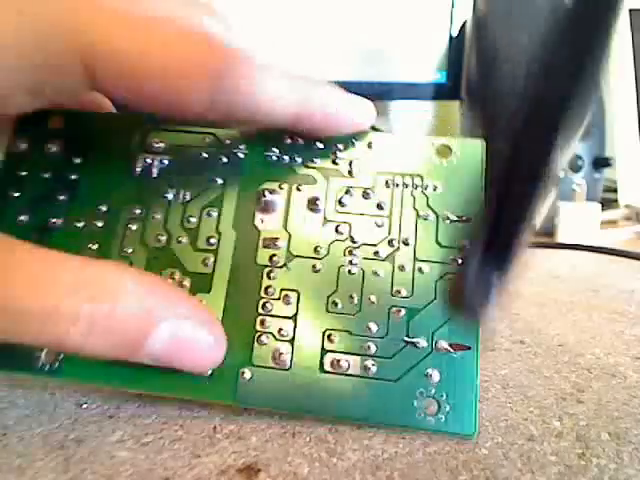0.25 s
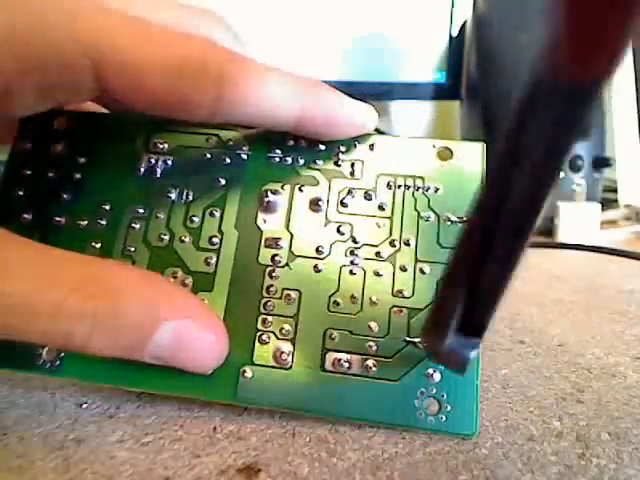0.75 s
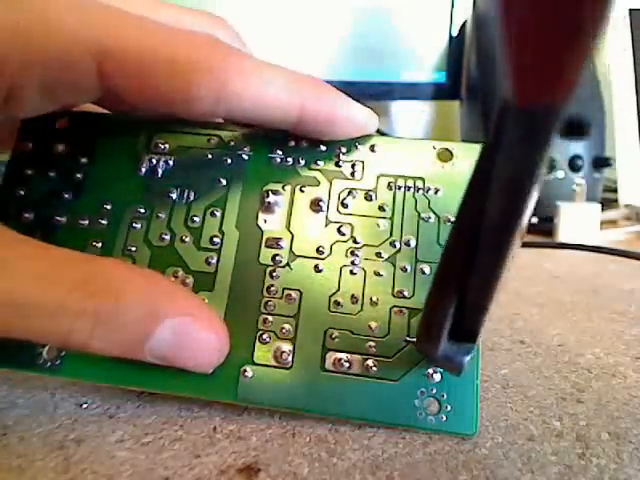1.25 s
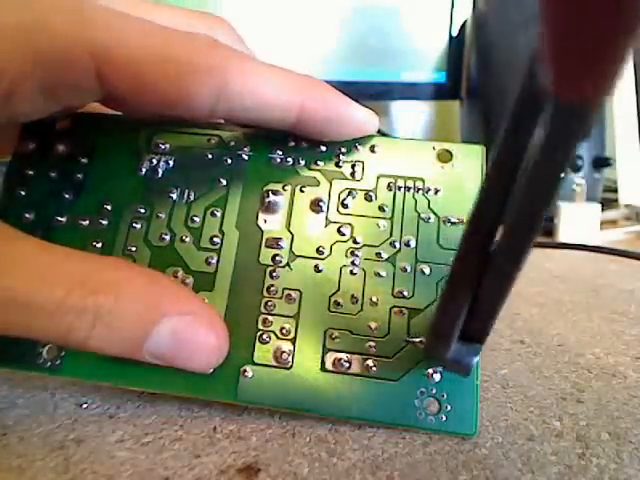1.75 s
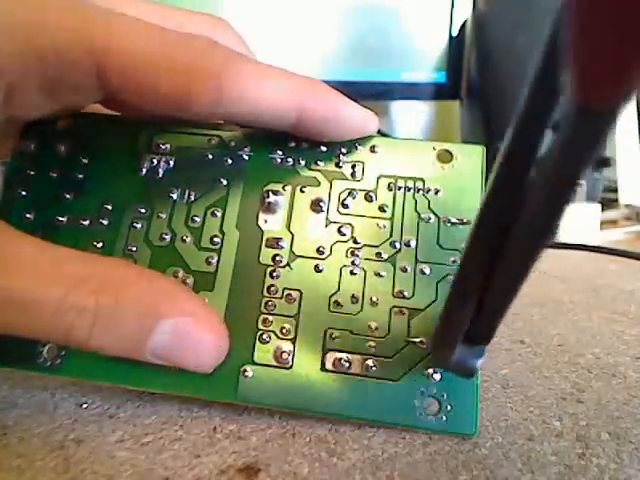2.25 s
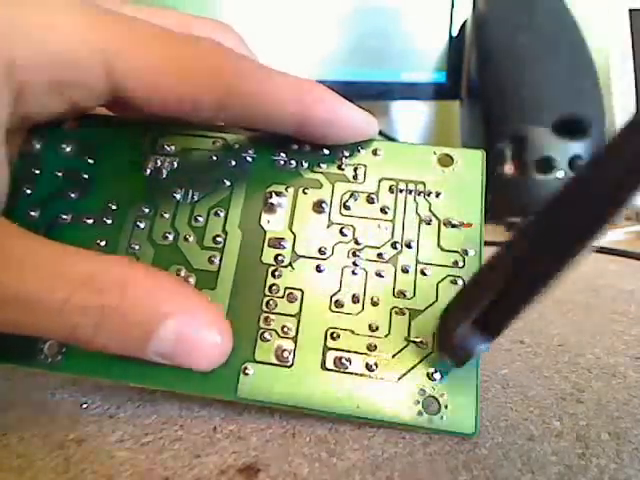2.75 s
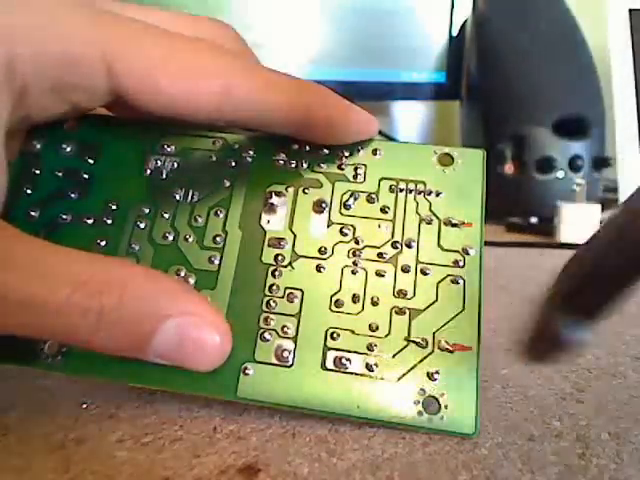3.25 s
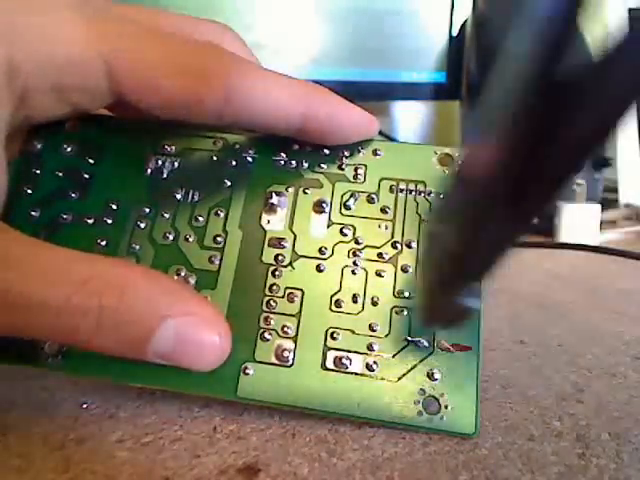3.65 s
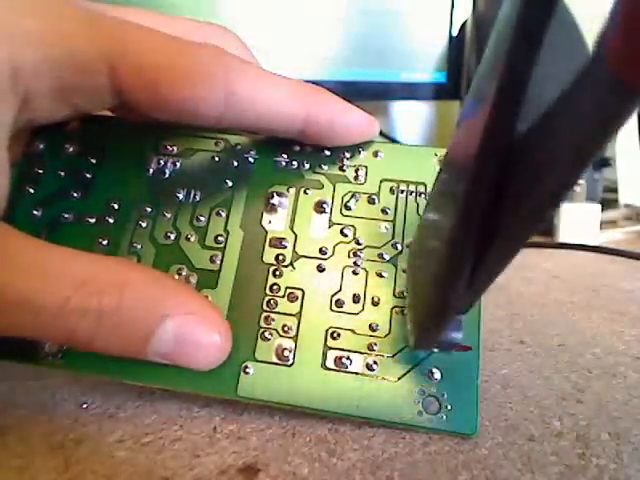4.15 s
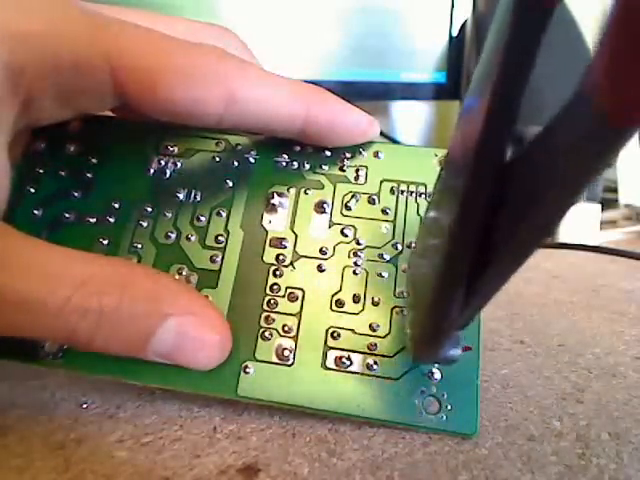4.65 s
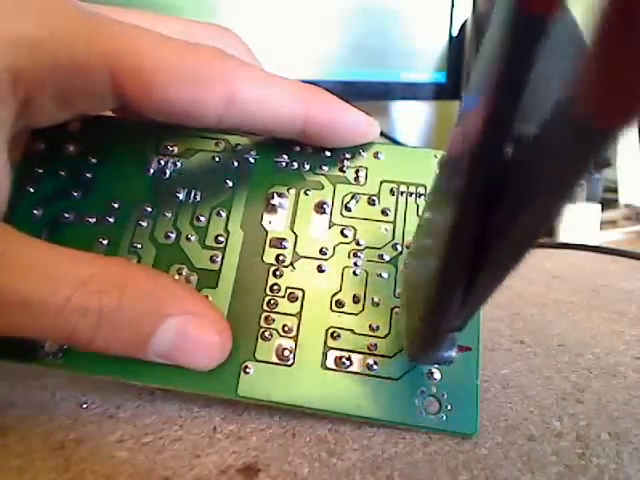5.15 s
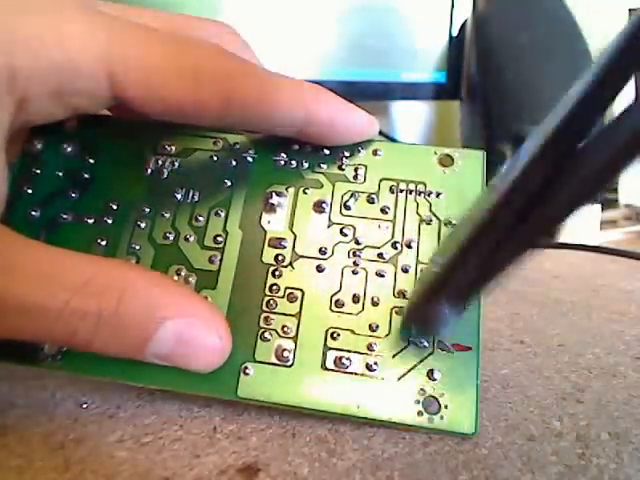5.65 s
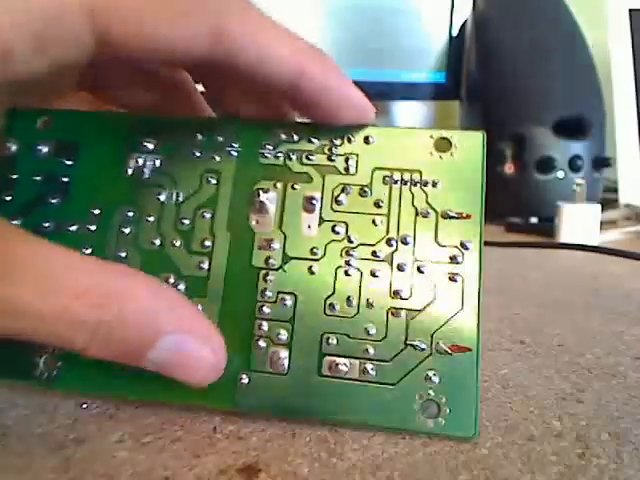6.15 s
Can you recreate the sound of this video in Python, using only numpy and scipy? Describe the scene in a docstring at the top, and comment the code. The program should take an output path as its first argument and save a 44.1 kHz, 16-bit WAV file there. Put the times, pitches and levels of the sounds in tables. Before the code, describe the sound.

Close, light knocks and steel clicks of cutters against a circuit board, with one crisp snip and a closing rattle over faint fan noise.

```python
"""A bench in a small room: wire cutters work at the leads of an upright, hand-held circuit board,
close to a small microphone. Equipment hums over fan noise. The jaws scrape and knock, ringing the
modes of board and steel; stick-slip friction makes faint squeaks and chirps. Steel clicks on steel,
one lead parts with a sharp snap that frees the board, and at the end the jaws clatter shut."""
import sys
import numpy as np
from scipy import signal
from scipy.fft import rfft, irfft
from scipy.io import wavfile

SR = 44100
rng = np.random.default_rng(int(sys.argv[2]) if len(sys.argv) > 2 else 0)


def persist_wave(psi):
    """Save psi, clipped to +-1, as 16-bit WAV."""
    counts = np.round(np.clip(psi, -1, 1) * 32767).astype(np.int16)
    wavfile.write(sys.argv[1], SR, np.atleast_2d(counts).T)


N = 282813
TIME_S = np.arange(N) / SR

# Steady equipment hum. Each row: frequency in Hz, RMS level in dB.
HUM_TONES = [(59.2, -56), (119.5, -62.5), (237, -62.5), (356, -68), (748, -65.5), (813, -69.5)]
# Hum tones that swell and fade. Each row: middle in seconds, length in seconds, frequency in Hz,
# top RMS level in dB.
HUM_SWELLS = [(.05, 0.3, 245, -55.5), (2.8, 1.05, 241.7, -50.5), (3.804, 0.7, 361.2, -53),
              (6.052, 2.6, 116.9, -51.5), (6.05, 1.3, 234.4, -54)]
# Fan and air noise spectrum. Each row: frequency in Hz, relative density in dB.
AIR_SPECTRUM = [(12, -21), (20, 7), (27, -7.5), (62, -3), (86, -9), (125, -12), (148, -11.5), (232, -17.5),
                (297, -10), (353, -15), (389, -15.5), (760, -21), (860, -22), (6220, -40.5), (7200, -44),
                (9620, -99), (16300, -120)]
# Board modes. Each row: frequency in Hz, level in dB, t60 in seconds, change for an edge hit in dB.
BOARD_MODES = [(131, -42.5, 0.31, 0), (183.8, -39.5, 0.11, 19), (221, -27.5, 0.11, 11),
               (299, -8.5, 0.055, -12.5), (334.3, -23, 0.081, 1.5), (390.4, -22, 0.065, 2.5),
               (527, -23.5, 0.036, -0.5), (657, -17.5, 0.045, -11), (708, -21, 0.072, -8.5),
               (838, -17, 0.025, 0), (945, -14.5, 0.012, 4.5), (1525, -18, 0.028, 2),
               (1580, -19.5, 0.03, -5), (2008, -16.5, 0.032, -2), (2180, -26, 0.0065, -6),
               (2660, -27.5, 0.02, 3)]
# Cutter modes, damped by the grip. Each row: frequency in Hz, level in dB, t60 in seconds.
STEEL_MODES = [(3040, -24.5, 0.013), (3590, -32.5, 0.015), (3796, -23.5, 0.019), (4220, -30, 0.025),
               (4480, -28.5, 0.014), (5440, -28.5, 0.0049), (5850, -29, 0.026), (6300, -36.5, 0.046),
               (6660, -28, 0.016), (6770, -30.5, 0.016), (7100, -33, 0.014), (7270, -34.5, 0.01)]
# Jaws sliding on the board. Each row: middle in seconds, length in seconds, board gain in dB,
# contact time in ms, nearness to the edge from 0 to 1, steel gain in dB.
SCRAPES = [(.172, 0.052, -26.5, 0.46, .65, -39), (0.404, 0.044, -14.5, 1.4, 0.93, -27),
           (.435, .04, -21, 1.35, 0.95, -28), (3.273, .06, -17, 0.61, 0.34, -24),
           (5.79, .14, -15.5, 0.66, 0.35, -25.5), (6.261, 0.052, -12, 1.43, 0.3, -18)]
# Breathy jaw squeaks. Each row: middle in seconds, length in seconds, pitch in Hz, top RMS level in dB,
# bandwidth in Hz.
SQUEAKS = [(0.409, 0.034, 820, -44, 250), (0.403, 0.079, 2830, -55.5, 450), (0.407, 0.098, 6370, -59, 700),
           (1.514, .012, 2710, -45, 800), (1.534, 0.017, 2770, -48, 300), (2.322, 0.18, 3210, -60, 650),
           (2.7, 0.1, 3100, -61.5, 550), (3.278, 0.029, 1550, -49, 350), (3.279, .02, 2800, -52, 400),
           (3.28, .02, 6230, -46, 500)]
# Jaws catching. Each row: middle in seconds, length in seconds, pitch in Hz, peak in dB.
CHIRPS = [(.397, .012, 2000, -46), (0.4135, .014, 2080, -43), (.429, .026, 2010, -45),
          (5.813, .009, 1556, -43), (5.835, .022, 1500, -42)]
# Jaws bumping the board. Each row: start in seconds, board gain in dB, contact time in ms,
# nearness to the edge from 0 to 1, steel gain in dB, board pitch as a ratio.
KNOCKS = [(1.01, -4, 1.27, 0.4, -16, 0.97), (1.109, -24, 0.69, 0.9, -38, 0.96),
          (1.3196, -5, 1.96, 0.37, -17.5, 0.96), (1.699, -17.5, 2.3, 0.14, -29, 1.08),
          (2.326, -13, 3.2, 0.6, -23, 1.01), (2.6246, -16.5, 2.4, 0.5, -30, 0.88),
          (3.1139, -10.5, 0.35, 0.6, -12, 1.05), (4.2012, -6.5, 0.46, 0.98, -33, 1.004),
          (4.2284, -9, 1.05, 0.56, -29, 1.09), (4.514, -12, 1.48, 0.55, -25, 0.98),
          (4.6023, -2, 0.66, 0.41, -20, 1), (4.6457, -6.5, 0.68, 0.68, -48, 1),
          (4.9178, 5.5, 1.82, 0.37, -8, 1.01), (4.978, -15.5, 1.3, 0.95, -36, 0.93),
          (5.348, -8, 1.34, 0.86, -31, 1.04), (5.7733, -9, 2.1, 0.36, -19.5, 1.06),
          (5.8569, -5.5, 3.0, 0.36, -20, 0.93), (6.248, -14, 1.9, 0.78, -23, 1.04)]
# Steel on steel. Each row: start in seconds, gain in dB, board contact time in ms, low cut in Hz.
CLICKS = [(2.6235, -23, 1.3, 3000), (3.1022, -14, 1.3, 1500), (3.1295, -23, .6, 2000),
          (3.149, -29, .6, 2500), (3.195, -22, .7, 5500), (3.4143, -9, 0.065, 4200),
          (3.5533, -24.5, .7, 4500), (4.977, -11.5, 2.06, 3300), (5.348, -10.5, 2.95, 2000)]
# Modes of the freed board and lead stub. Each row: frequency in Hz, level in dB, t60 in seconds.
FREED_MODES = [(320, -17.5, 0.12), (392, -30, 0.16), (720, -22, 0.11), (816, -26.5, 0.1), (966, -16, 0.036),
               (1450, -13.5, 0.033), (1506, -18, 0.024), (2020, -11, 0.034), (2225, -29, .05),
               (2570, -18, 0.027), (3250, -17.5, 0.026), (3420, -29, 0.03), (4160, -24, 0.024),
               (4570, -19.5, 0.02), (6030, -33, .03), (6500, -27, 0.031), (6910, -24.5, 0.027)]
# Closing touches that grow, then settle. Each row: start in seconds, gain in dB.
CLATTER_TOUCHES = [(6.3463, -4), (6.3493, -2.5), (6.3519, 4), (6.3563, -7.5), (6.372, -24), (6.396, -19)]
# Cutter modes with the jaws shut. Each row: frequency in Hz, level in dB, t60 in seconds.
SHUT_MODES = [(1290, -31, .015), (1855, -33.5, 0.027), (1990, -33, .03), (2760, -24.5, 0.013),
              (3320, -39, .04), (3520, -25, 0.02), (3806, -20.5, 0.022), (3986, -30, .02), (4260, -32, .04),
              (5370, -30, 0.031), (5920, -31, .018), (6630, -28, 0.018), (7380, -27.5, 0.028)]
# Room echo. Each row: frequency in Hz, level in dB, t60 in seconds.
ROOM_DECAY = [(120, -12.5, 0.47), (302, -10, 0.67), (800, -8, 0.28), (2000, -12, 0.19), (4500, -11, 0.24),
              (7500, -14, 0.4)]

GRIND_S = 0.018  # slip of the edges at the cut and the closing
CLICK_EDGE = 0.51  # nearness to the board's edge for clicks and clatter


def from_db(db):
    """Decibels to gain."""
    return 10 ** (np.asarray(db) / 20)


def unit_energy(x):
    """Scale to the energy of a unit click."""
    return x / np.sqrt(np.sum(x ** 2) + 1e-20)


def filtered(x, hz, kind):
    """Butterworth filter of order 2."""
    return signal.sosfilt(signal.butter(2, hz, kind, fs=SR, output="sos"), x)


def at_hz(rows, hz):
    """Interpolate a spectrum's columns over log frequency."""
    points_hz, *columns = np.transpose(rows)
    return [np.interp(np.log(hz), np.log(points_hz), column) for column in columns]


def add(track, start_s, sound):
    """Mix a sound into a track."""
    start = max(round(start_s * SR), 0)
    part = sound[:max(N - start, 0)]
    track[start:start + len(part)] += part


def dying_noise(t, t60_s):
    """Unit-energy noise that falls 60 dB in t60_s."""
    return unit_energy(rng.standard_normal(len(t)) * np.exp(-np.log(1000) * t / t60_s))


def body(force, modes, wash_db, wash_t60_s, wash_hz, build_cycles=0.93, spread_db=1.5):
    """A struck body rings in its main modes, varied per hit, and a short wash of many weak ones."""
    t, ring = TIME_S[:SR // 5], 0
    for hz, db, t60_s in modes:
        envelope = np.exp(-np.log(1000) * t / t60_s) * (1 - np.exp(-t * hz / build_cycles))
        gain = from_db(db + spread_db * rng.standard_normal())
        ring = ring + gain * envelope * np.cos(2 * np.pi * hz * t)
    wash = from_db(wash_db) * filtered(dying_noise(t, wash_t60_s), wash_hz, "band")
    return signal.fftconvolve(force, ring + wash)


def hum():
    """Equipment tones: some steady, some rising and falling in an arch."""
    tones = [(hz, from_db(db)) for hz, db in HUM_TONES]
    for middle_s, length_s, hz, db in HUM_SWELLS:
        arch = np.cos(np.pi * np.clip((TIME_S - middle_s) / length_s, -0.5, 0.5))
        tones.append((hz, from_db(db) * arch))
    return np.sqrt(2) * sum(rms * np.sin(2 * np.pi * (hz * TIME_S + rng.random())) for hz, rms in tones)


def air(rms_db=-47.5):
    """Steady rush of fans and room air."""
    hz = np.maximum(np.arange(N // 2 + 1) * SR / N, 1)
    density_db, = at_hz(AIR_SPECTRUM, hz)
    noise = irfft(rfft(rng.standard_normal(N)) * from_db(density_db), N)
    return from_db(rms_db) * np.sqrt(N) * unit_energy(noise)


def slide(length_s, slips_per_s=1400, spread_db=4):
    """Force of one stroke: many tiny, uneven slips."""
    size = int(length_s * SR)
    slips = (rng.random(size) < slips_per_s / SR) * rng.choice([-1, 1], size)
    return unit_energy(slips * from_db(spread_db * rng.standard_normal(size)) * np.hanning(size))


def soften(force, contact_ms, rebound_ratio=0.019):
    """A long contact passes less treble; a short one bounces off and moves little bass."""
    corner_hz = min(1000 / contact_ms, 0.4 * SR)
    return filtered(filtered(force, corner_hz, "low"), rebound_ratio * corner_hz, "high")


def contact(force, board_db, contact_ms, edge, steel_db, stiffness_ratio=7.1, pitch_ratio=1):
    """One force drives the board and the stiffer jaws; where it lands weights the board modes."""
    modes = [(hz * pitch_ratio, db + edge * edge_db, t60_s) for hz, db, t60_s, edge_db in BOARD_MODES]
    board_force = soften(force, contact_ms)
    steel_force = soften(force, contact_ms / stiffness_ratio)
    board = body(board_force, modes, wash_db=2, wash_t60_s=0.055, wash_hz=(330, 1100))
    steel = body(steel_force, STEEL_MODES, wash_db=-1.5, wash_t60_s=0.033, wash_hz=(2800, 9500))
    return from_db(board_db) * board + from_db(steel_db) * steel


def scrapes():
    """The jaws slide over solder and copper."""
    out = np.zeros(N)
    for middle_s, length_s, board_db, contact_ms, edge, steel_db in SCRAPES:
        add(out, middle_s - length_s / 2, contact(slide(length_s), board_db, contact_ms, edge, steel_db))
    return out


def room(x, onset_s=0.0014):
    """Bench and wall reflections merge into a tail that dies band by band."""
    t, tail = TIME_S[:SR * 3 // 4], 0
    edges_hz = np.geomspace(80, 9000, 12)
    for low_hz, high_hz in zip(edges_hz, edges_hz[1:]):
        db, t60_s = at_hz(ROOM_DECAY, np.sqrt(low_hz * high_hz))
        tail = tail + from_db(db) * filtered(dying_noise(t, t60_s), (low_hz, high_hz), "band")
    return signal.fftconvolve(x, tail * np.minimum(t / onset_s, 1) ** 2)[:N]


def squeaks():
    """Dry friction excites narrow resonances; pitch depends on where the jaws catch."""
    out = np.zeros(N)
    for middle_s, length_s, hz, db, width_hz in SQUEAKS:
        size = int(length_s * SR)
        noise = filtered(rng.standard_normal(SR // 4), (hz - width_hz / 2, hz + width_hz / 2), "band")
        rub = unit_energy(noise[-size:]) * np.sqrt(size)
        add(out, middle_s - length_s / 2, from_db(db) * rub * np.hanning(size))
    return out


def chirps(sag_per_s=1.2, waver_depth=0.041, waver_hz=450):
    """Stick-slip locks onto one resonance: a short, unsteady tone that sags as pressure eases."""
    out = np.zeros(N)
    for middle_s, length_s, hz, db in CHIRPS:
        t = TIME_S[:int(length_s * SR)]
        noise = filtered(rng.standard_normal(SR // 4), waver_hz, "low")
        waver = waver_depth * noise[-len(t):] / noise.std()
        pitch_hz = hz * (1 - sag_per_s * (t - length_s / 2) + waver)
        tone = np.sin(2 * np.pi * np.cumsum(pitch_hz) / SR)
        add(out, middle_s - length_s / 2, from_db(db) * np.sin(np.pi * t / length_s) * tone)
    return out


def tap(crunch=0.5, crunch_t60_s=0.02, low_cut_hz=450):
    """Force of one touch: a sharp push, then the fine crunch of yielding metal."""
    force = crunch * filtered(dying_noise(TIME_S[:SR // 20], crunch_t60_s), low_cut_hz, "high")
    force[0] += 1
    return force / np.sqrt(1 + crunch ** 2)


def knocks(stiffness_ratio=4.1):
    """Each bump rings board and steel; the press of the jaws shifts the board's pitch a little."""
    out = np.zeros(N)
    for start_s, board_db, contact_ms, edge, steel_db, pitch_ratio in KNOCKS:
        knock = contact(tap(), board_db, contact_ms, edge, steel_db, stiffness_ratio, pitch_ratio)
        add(out, start_s, knock)
    return out


def clicks(board_offset_db=-26):
    """Steel meets steel and barely shakes the board; a touch near the tips favours high modes."""
    out = np.zeros(N)
    for start_s, db, contact_ms, low_cut_hz in CLICKS:
        ring = contact(tap(), db + board_offset_db, contact_ms, CLICK_EDGE, steel_db=db)
        add(out, start_s, filtered(ring, low_cut_hz, "high"))
    return out


def snip(snap_s=3.1049, grind_ahead_s=0.004):
    """The edges grind into the lead; it parts with a dry crack and frees the board."""
    out = np.zeros(N)
    grind = contact(slide(GRIND_S), board_db=-9.5, contact_ms=0.27, edge=0.57, steel_db=-7)
    add(out, snap_s - grind_ahead_s - GRIND_S / 2, grind)
    release = tap(crunch=0.27, crunch_t60_s=0.015)
    crack = body(release, FREED_MODES, wash_db=-4, wash_t60_s=0.024, wash_hz=(6800, 14500),
                 build_cycles=1)
    add(out, snap_s, crack)
    return out


def shut_jaws(force, db):
    """The closed jaws ring brightly; a little of the blow reaches the board."""
    steel = body(force, SHUT_MODES, wash_db=-3, wash_t60_s=0.027, wash_hz=(1100, 8800), build_cycles=1.5)
    board = contact(force, board_db=db - 18, contact_ms=0.99, edge=CLICK_EDGE, steel_db=-np.inf)
    return from_db(db) * steel + board


def clatter(grind_lag_s=0.000977, rattle_ahead_s=0.02):
    """The jaws grind, click shut in a quick run and rattle in their loose joint."""
    out, first_s = np.zeros(N), CLATTER_TOUCHES[0][0]
    add(out, first_s + grind_lag_s - GRIND_S / 2, shut_jaws(slide(GRIND_S), db=-5.5))
    for start_s, db in CLATTER_TOUCHES:
        add(out, start_s, shut_jaws(tap(), db))
    add(out, first_s - rattle_ahead_s, shut_jaws(slide(length_s=0.061), db=-15))
    return out


def scene():
    """Close work, its echo and the background, in mono."""
    work = knocks() + snip() + clatter() + clicks() + scrapes() + squeaks() + chirps()
    return (work + room(work) + hum() + air())[None]


def record(dry, ceiling=0.5, cut_hz=7400, fizz_hz=9300, fizz_db=-21.5, top_hz=15200, dc=-0.0134):
    """Dull-topped sound: rounded peaks, a steep treble cut, faint fizz above it, a DC offset."""
    rounded = ceiling * np.tanh(dry / ceiling)
    dull = signal.sosfilt(signal.cheby1(10, 0.2, cut_hz, fs=SR, output="sos"), rounded)
    fizz = from_db(fizz_db) * filtered(rounded, fizz_hz, "high")
    top_cut = signal.ellip(10, 0.2, 70, top_hz, fs=SR, output="sos")
    return signal.sosfilt(top_cut, dull + fizz) + dc


dry = scene()
out = record(dry)
persist_wave(out)
```